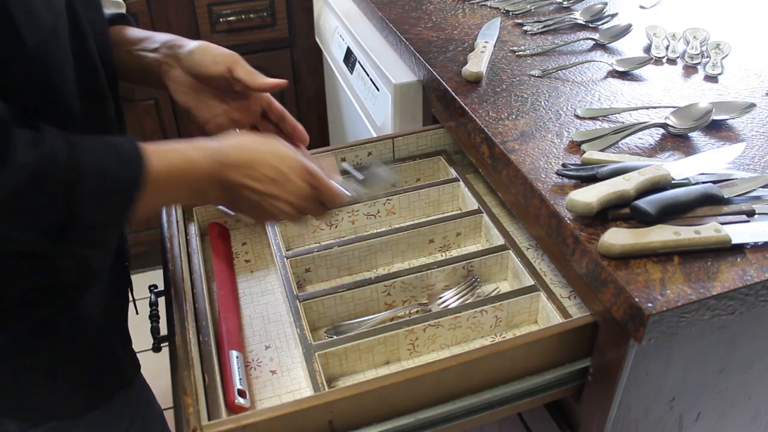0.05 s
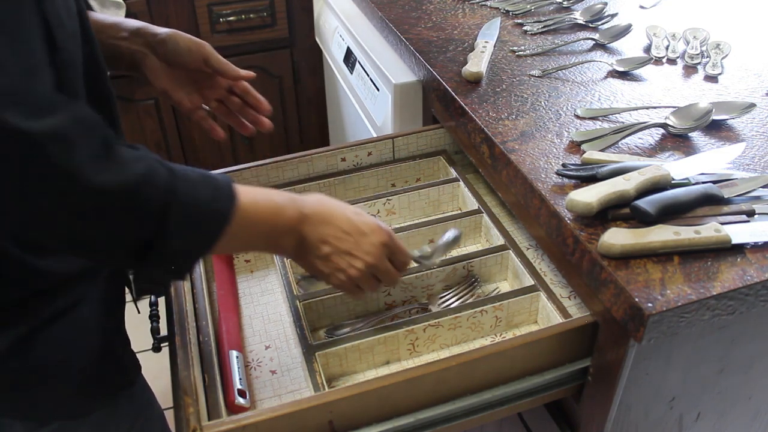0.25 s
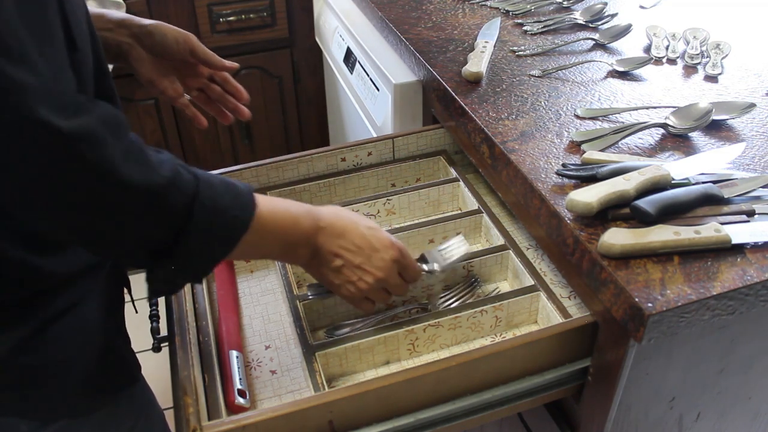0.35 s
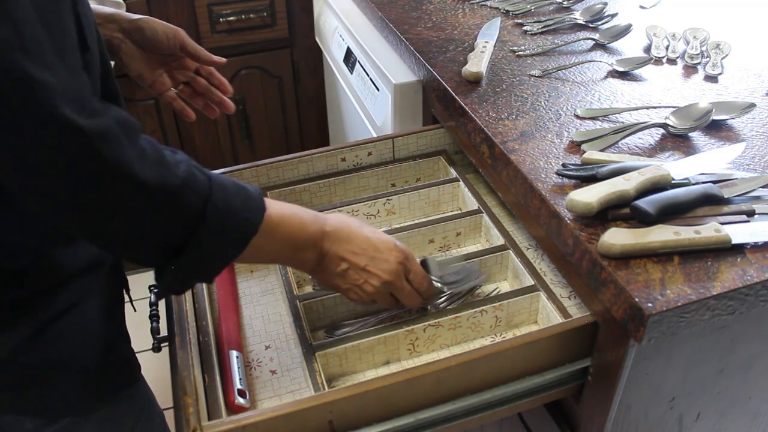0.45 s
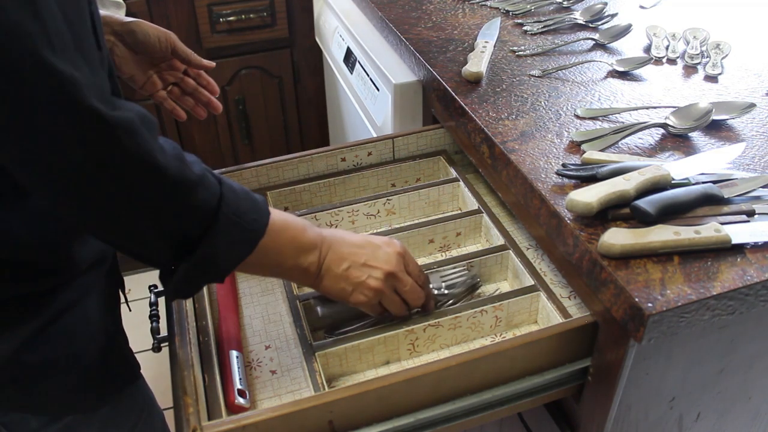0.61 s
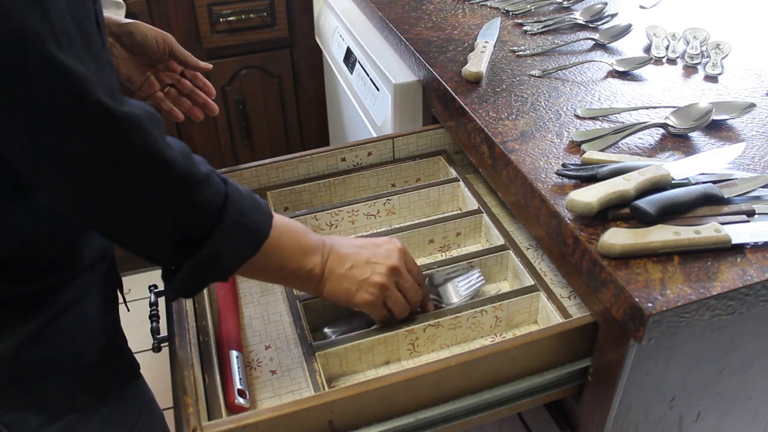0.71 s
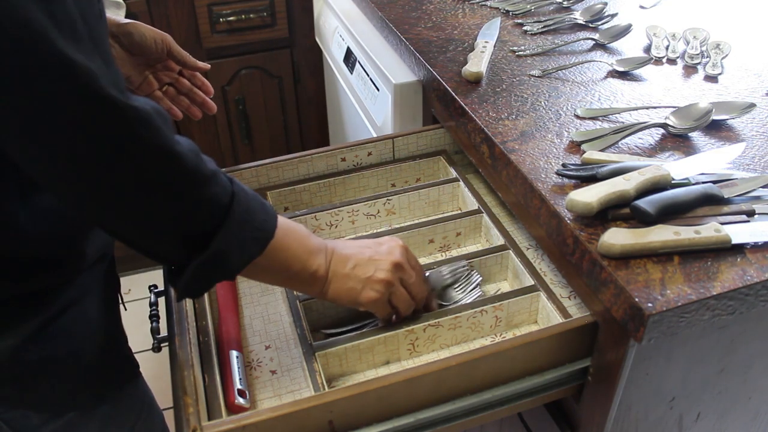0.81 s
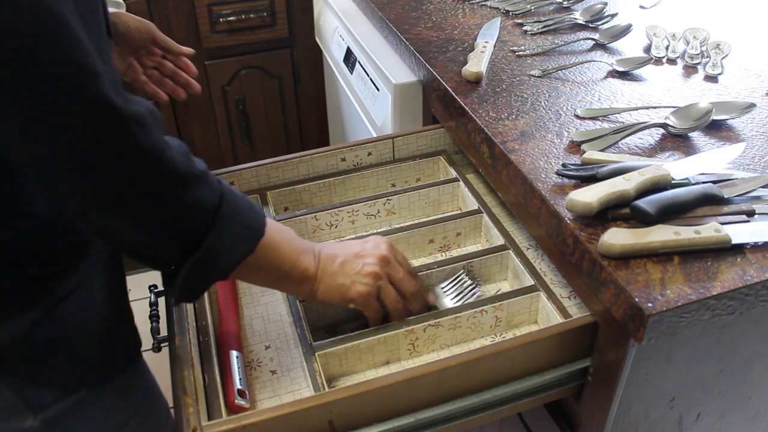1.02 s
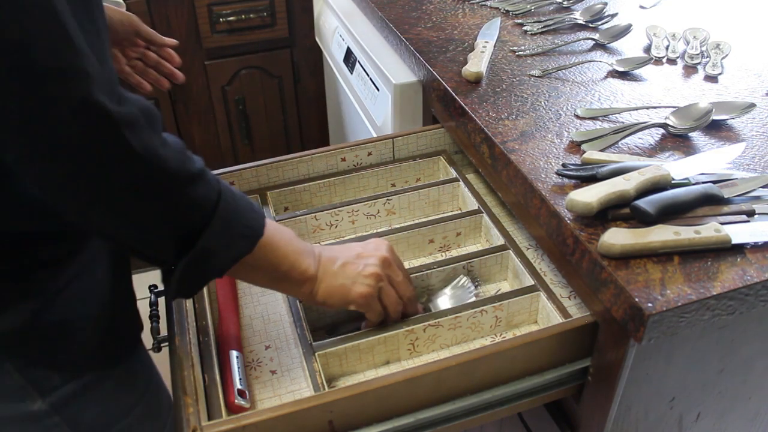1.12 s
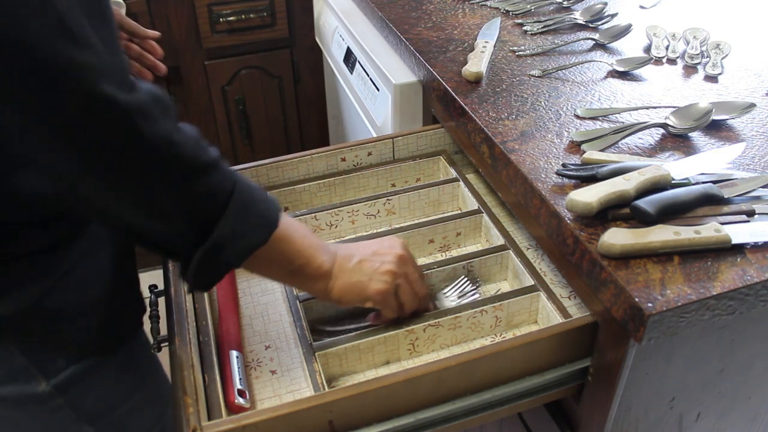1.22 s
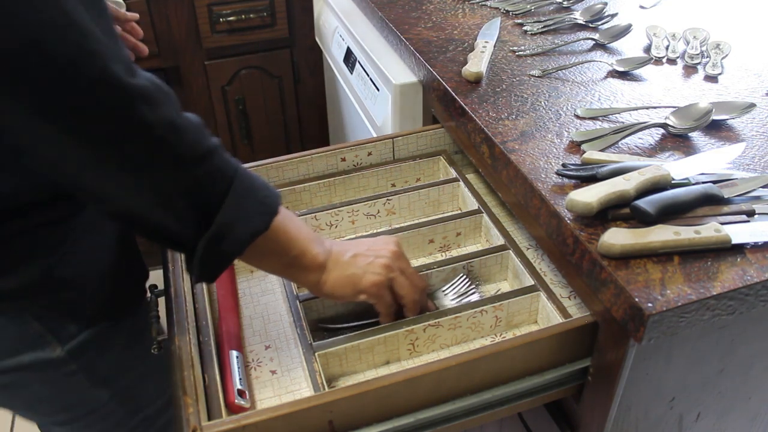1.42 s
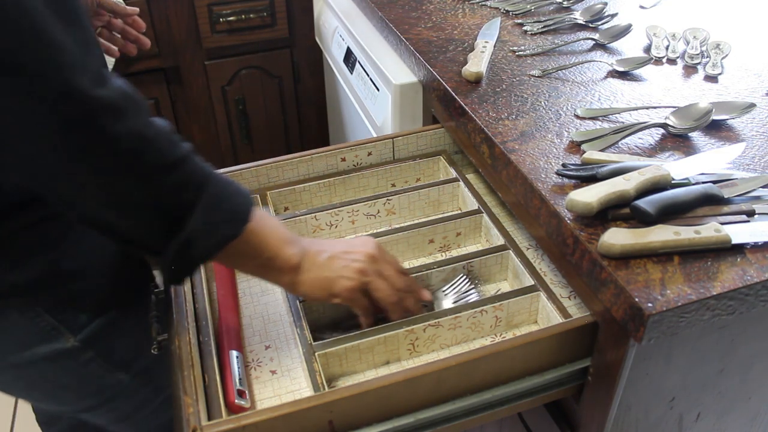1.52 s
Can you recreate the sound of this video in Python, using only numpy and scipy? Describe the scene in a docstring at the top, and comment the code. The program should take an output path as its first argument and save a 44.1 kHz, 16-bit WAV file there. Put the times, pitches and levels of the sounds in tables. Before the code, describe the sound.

Steel forks clink in a hand, then clatter onto other forks in a drawer tray. They knock and scrape lightly as they are pushed into line, heard close by in a small, quiet kitchen.

```python
"""Steel forks clink in a hand, are laid on others in a kitchen drawer tray and are pushed into line.
Each clink is a contact that chatters and rings the forks. The first fork clacks on a thin divider;
handles knock and scrape on the hollow tray. A small kitchen answers briefly, over low room noise
and a faint mains hum."""
import sys
import numpy as np
from scipy import signal
from scipy.fft import rfft, irfft, next_fast_len
from scipy.io import wavfile

SR = 44100
rng = np.random.default_rng(int(sys.argv[2]) if len(sys.argv) > 2 else 0)


def wrap_up_sound(samples):
    """Save the sound to the file named by the first command line argument, as 16-bit audio."""
    columns = np.atleast_2d(samples).T
    # keep every value between -1 and 1, then stretch to whole-number steps
    tamed = np.clip(columns, -1, 1)
    steps = np.round(tamed * 32767).astype(np.int16)
    wavfile.write(sys.argv[1], SR, steps)


N = 68355
T = np.arange(N) / SR
TAIL = T[:N // 3]

# room noise spectrum: f/Hz, level/dB
AIR_SPECTRUM = [(25, 5), (50, -11.5), (80, -1), (120, 9), (200, 0.5), (500, -6), (1200, -15.5), (2000, -20),
                (5000, -14), (16000, -34)]
# room echo spectrum: f/Hz, level/dB
ROOM_SPECTRUM = [(100, 9), (1000, -0.5), (4000, 0.5), (9000, -7), (16000, -20)]
# slow low modes of the held forks: f/Hz, initial level/dB, t60/s
HELD_MODES = [(623, -54, 4.8), (644, -58.5, 5.9), (918, -58, 4.9), (1264, -63, 3.9), (1198, -60, 13)]
# base curve over the span that contact hardness tilts: f/Hz, level/dB
TILT_SPECTRUM = [(300, 0), (8500, 2)]
# tray and drawer modes: f/Hz, level/dB, t60/s
TRAY_MODES = [(230.8, -9.5, 0.25), (355.5, -8, 0.24), (463.6, -7.5, .13), (688.4, 1, 0.11),
              (1103, -0.5, 0.12), (1226.4, 5, 0.071), (1678, -13, 0.13), (2870, -2.5, 0.13),
              (3008, 4.5, 0.12), (3463, -6, 0.069), (3650, 3.5, 0.04), (4400, -12, .1)]
# divider modes: f/Hz, level/dB, t60/s
DIVIDER_MODES = [(808, -4.5, 0.023), (872, 0.5, 0.024), (1110, 0, 0.025), (1390, -1, 0.023),
                 (1620, -1, 0.024), (1884, -3.5, 0.044), (2900, -6.5, 0.041)]
# dry knock of tray and divider: f/Hz, level/dB
THUD_SPECTRUM = [(40, -36), (100, 1), (180, -5.5), (380, 3), (540, -3), (850, 0), (1250, 3), (2100, -3.5),
                 (3000, 6), (4300, -7), (7000, -12), (16000, -27)]
# fork bending modes: f/Hz, level/dB, t60/s
FORK_MODES = [(1108, -16, 0.26), (2020, -15, 0.16), (3454, -9, 0.27), (4600, -13, 0.37), (6580, 0, 0.13),
              (7330, -12, 0.15), (9030, 8.5, 0.07), (10470, 4, 0.075), (11000, -8.5, 0.18),
              (11440, 6, 0.063), (12700, -2.5, 0.15), (14050, 6.5, 0.059), (14100, 1.5, 0.12),
              (15800, 7.5, 0.07)]
# dense, quickly damped ring of the touching pile: f/Hz, level/dB
CLASH_SPECTRUM = [(200, -16), (900, -16.5), (1600, -12.5), (2500, -5), (5000, -4.5), (8000, -0.5),
                  (10000, 1.5), (13000, -5.5), (15000, -0.5), (17000, -28)]
# sliding under the hand: t/s, steel-on-steel level/dB, steel-on-tray level/dB
SLIDE_LEVELS = [(0, -38.5, -67), (.40, -57, -76), (.47, -45.5, -53), (.52, -34, -48.5), (.64, -30, -36.5),
                (0.678, -23, -21), (.76, -22.5, -37), (.84, -20.5, -25), (0.869, -24, -32.5),
                (.895, -34.5, -30.5), (1.001, -41.5, -38), (1.068, -27, -26.5), (1.12, -53, -43),
                (1.185, -56, -46), (1.209, -42, -29), (1.29, -30, -31.5), (1.385, -47.5, -33.5),
                (1.425, -63, -32.5), (1.55, -61, -39)]
# handle on tray: t/s, level/dB, chatter/s, tilt/(dB/oct), low cut f/Hz
TRAY_HITS = [(.669, -12, 0.045, 3, 198), (.699, -18.5, 0.0027, -1.5, 196), (.7055, -8, 0.0024, -0.5, 178),
             (.765, -12.5, 0.015, -0.5, 298), (.786, -14.5, 0.012, -3, 336), (.8025, -1.5, 0.00067, 1, 280),
             (.813, -13, 0.012, -0.5, 303), (.909, -26.5, 0.0071, -7, 256),
             (1.0555, -13.5, 0.011, -2.5, 171), (1.199, -15.5, 0.036, 0, 152),
             (1.268, -14, 0.016, 0.5, 138), (1.354, -17.5, .01, -2.5, 183), (1.386, -23.5, 0.0076, -4, 204),
             (1.4085, -18.5, 0.0029, 3.5, 493), (1.467, -27, 0.0035, 0, 204), (1.483, -34, 0.001, 2, 148),
             (1.542, -26.5, 0.0076, -6, 102)]
# fork on divider: t/s, level/dB, chatter/s, tilt/(dB/oct), low cut f/Hz
DIVIDER_HITS = [(.6255, -8.5, 0.00091, 0, 250)]
# fork on fork: t/s, level/dB, chatter/s, tilt/(dB/oct), free ring level/dB
FORK_HITS = [(.0144, -28.5, 0.00073, 3, -9), (.0338, -31.5, .007, -3.5, 4), (.0458, -39, 0.0024, -4, -12),
             (.0807, -25.5, 0.0084, 3, 6), (.1146, -21.5, 0.017, 3.5, -3), (.1984, -27, 0.0016, -3, -10),
             (.2058, -11, 0.0044, 1, 4), (.2125, -12.5, 0.019, -2, -2), (.2693, -8, 0.0011, 1.5, 10),
             (.2867, -3, 0.0042, 7.5, 2), (.2915, -8.5, 0.0034, 4, -9), (.412, -27.5, 0.0072, -1.5, -6),
             (.423, -24, 0.007, -3, 10), (.479, -14, 0.034, 0, -2), (.4935, -10, 0.0025, -2, 21),
             (.5205, -15, 0.0068, 4, 5), (.5621, -22, 0.017, 2, 18), (.589, -19.5, 0.0086, -6, 8),
             (.597, -22, 0.02, 3, 0), (.6095, -9.5, 0.01, -2.5, 5), (.623, -12, 0.0056, 15, 8),
             (.652, -11, 0.01, 10, 3), (.7013, -12, 0.0053, -6.5, 4), (.7375, -7, 0.014, -1, 34),
             (.7500, -10, .014, 5, 5), (.7851, -5, 0.0014, -6, -3.5), (.8025, -27, .003, -3, 8),
             (.833, -13, 0.015, -7.5, 6), (1.0116, -33, 0.0017, 0, -13), (1.0221, -17.5, 0.0099, -3, -3),
             (1.0405, -8, 0.0054, -5, 5), (1.0545, -7, 0.0016, -4.5, 3), (1.061, -9, 0.012, 0.5, -7),
             (1.191, -20.5, 0.0072, -5, -6), (1.2032, -14, 0.019, 1, -25), (1.2445, -16.5, 0.0032, -3, -18),
             (1.2715, -14, 0.01, -0.5, -9), (1.3453, -17, 0.015, -7, -8), (1.4077, -23.5, 0.0011, -6.5, 0),
             (1.509, -28.5, 0.0027, -9.5, -12)]

SLIDE_T_S, SLIDE_STEEL_DB, SLIDE_TRAY_DB = np.array(SLIDE_LEVELS).T
CHATTER_PER_S, CHATTER_GAIN, SLIDE_PER_S, SCATTER_DB = 900, 0.45, 700, 4
THUD_T60_S, CLASH_T60_S = 0.024, 0.052


def undb(db):
    """Decibels to gain."""
    return 10 ** (np.asarray(db) / 20)


def unit(x):
    """Scale to unit energy."""
    return x / np.sqrt(np.sum(x ** 2) + 1e-18)


def fade(t60_s, t=TAIL):
    """Exponential decay, 60 dB in t60_s."""
    return np.exp(-np.log(1000) * t / max(t60_s, 1e-3))


def low_cut(x, hz):
    """Third-order high-pass; small objects radiate little bass."""
    return signal.sosfilt(signal.butter(3, hz, "high", fs=SR, output="sos"), x)


def colour(x, spectrum, tilt_db_oct=0):
    """Minimum-phase filter through (f/Hz, level/dB) points, plus tilt."""
    size = 2 * next_fast_len(len(x))
    hz, db = np.array(spectrum, float).T
    bins_hz = np.arange(size // 2 + 1) * SR / size
    curve_db = np.interp(np.log2(bins_hz + 1), np.log2(hz), db + tilt_db_oct * np.log2(hz / hz[-1]))
    cepstrum = irfft(np.log(undb(curve_db)))[:size // 2]
    cepstrum[1:] *= 2
    return irfft(rfft(x, size) * np.exp(rfft(cepstrum, size)))[:len(x)]


def mode_bank(modes, spread=0, count=1):
    """Decaying sines, one row per mode and object; objects differ slightly in pitch."""
    jitter = rng.uniform(-0.22, 0.24, (len(modes), count))
    detune = (np.arange(count) - (count - 1) / 2 + jitter) * 2 / count
    return np.array([undb(db) * fade(t60_s) * np.sin(2 * np.pi * hz * (1 + spread * d) * TAIL)
                     for (hz, db, t60_s), row in zip(modes, detune) for d in row])


def contacts(per_s, size):
    """Random tiny impacts of uneven strength."""
    impulses = (rng.random(size) < per_s / SR) * rng.choice([-1, 1], size)
    return impulses * undb(SCATTER_DB * np.clip(rng.standard_normal(size), -2, 2))


def strike(bank, spectrum, crack_t60_s, ring_db, crack_db):
    """Response to one contact: modes weighted by where it lands, plus a dry crack."""
    weights = rng.choice([-1, 1], len(bank)) * rng.uniform(0.8, 1, len(bank))
    crack = colour(rng.standard_normal(len(TAIL)) * fade(crack_t60_s), spectrum)
    return undb(ring_db) * unit(weights @ bank) + undb(crack_db) * unit(crack)


def blows(hits, body):
    """First contact, then dying chatter; each hit's last column goes to body()."""
    out = np.zeros(N)
    for start_s, db, chatter_s, tilt_db_oct, setting in hits:
        force = CHATTER_GAIN * contacts(CHATTER_PER_S, len(TAIL)) * np.exp(-(TAIL / chatter_s) ** 2 / 2)
        force[0] = 1
        response = signal.fftconvolve(force, body(setting))[:len(TAIL)]
        blow = undb(db) * unit(colour(response, TILT_SPECTRUM, tilt_db_oct))
        i = int(start_s * SR)
        out[i:i + len(blow)] += blow[:N - i]
    return out


def slide(levels_db, body, setting, points=6):
    """Streams of small catches at several contact points."""
    gain = undb(np.interp(T, SLIDE_T_S, levels_db))
    out = np.zeros(N)
    for _ in range(points):
        catches = unit(contacts(SLIDE_PER_S / points, N)) * np.sqrt(N / points)
        out += signal.fftconvolve(catches * gain, unit(body(setting)))[:N]
    return out


def background(air_db=-51.5, hum_db=-56.5, hum_hz=120.3):
    """Low room noise and an appliance's mains hum."""
    air = unit(colour(rng.standard_normal(N), AIR_SPECTRUM)) * np.sqrt(N)
    hum = np.sqrt(2) * np.sin(2 * np.pi * hum_hz * T)
    return undb(air_db) * air + undb(hum_db) * hum


def kitchen_echo(direct, gain_db=-16, t60_s=0.56, delay_s=0.0022):
    """Short diffuse reverberation of a small room."""
    reflections = rng.standard_normal(len(TAIL)) * fade(t60_s) * (TAIL > delay_s)
    response = unit(colour(reflections, ROOM_SPECTRUM))
    return undb(gain_db) * signal.fftconvolve(direct, response)[:N]


def held_forks():
    """Forks in the hand still ring faintly from being picked up."""
    return sum(undb(db) * np.sqrt(2) * fade(t60_s, T) * np.sin(2 * np.pi * (hz * T + rng.random()))
               for hz, db, t60_s in HELD_MODES)


def divider(clack_db=19.5):
    """The first fork lands on a thin divider: a hollow clack."""
    bank = mode_bank(DIVIDER_MODES)

    def body(cut_hz):
        return low_cut(strike(bank, THUD_SPECTRUM, THUD_T60_S, ring_db=0, crack_db=-7), cut_hz)

    return undb(clack_db) * blows(DIVIDER_HITS, body)


def tray(knock_db=19, slide_cut_hz=162):
    """Handles knock and scrape on the hollow tray; the spot sets the low cut."""
    bank = mode_bank(TRAY_MODES)

    def body(cut_hz):
        return low_cut(strike(bank, THUD_SPECTRUM, THUD_T60_S, ring_db=-5, crack_db=0.5), cut_hz)

    return undb(knock_db) * blows(TRAY_HITS, body) + slide(SLIDE_TRAY_DB, body, slide_cut_hz)


def forks(clink_db=19.5, slide_ring_db=4, cut_hz=680):
    """Steel clinks and slides on steel: bending modes ring over the pile's damped clash."""
    bank = mode_bank(FORK_MODES, spread=0.01705, count=7)

    def body(ring_db):
        return low_cut(strike(bank, CLASH_SPECTRUM, CLASH_T60_S, ring_db, crack_db=1.5), cut_hz)

    return undb(clink_db) * blows(FORK_HITS, body) + slide(SLIDE_STEEL_DB, body, slide_ring_db)


def scene():
    """Mono mix of background, echo and cutlery."""
    direct = divider() + tray() + forks()
    return (background() + kitchen_echo(direct) + held_forks() + direct)[None]


def record(dry, clip_level=0.77, bass_hz=45, top_hz=15650):
    """Microphone clips on overload; bass rolled off, top cut steeply."""
    clipped = np.clip(dry, -clip_level, clip_level)
    lowpass = signal.ellip(12, .1, 85, top_hz, fs=SR, output="sos")
    return signal.sosfilt(lowpass, low_cut(clipped, bass_hz))


dry = scene()
out = record(dry)
wrap_up_sound(out)
```